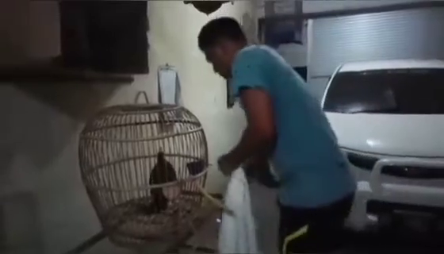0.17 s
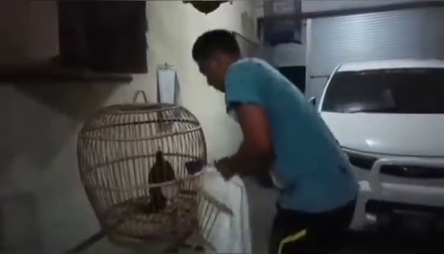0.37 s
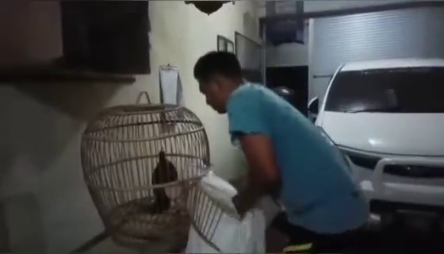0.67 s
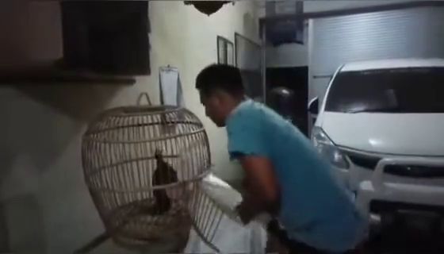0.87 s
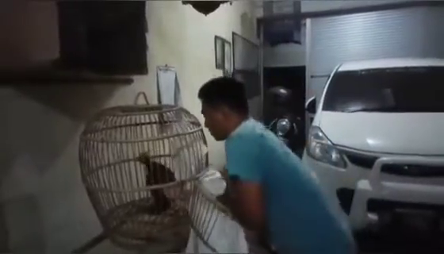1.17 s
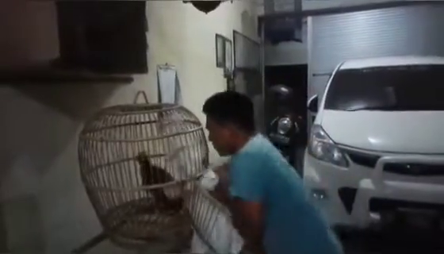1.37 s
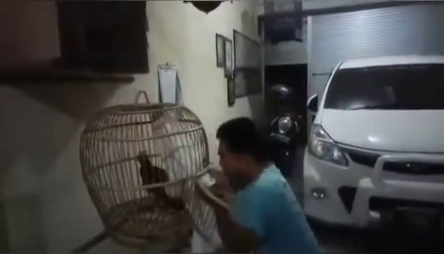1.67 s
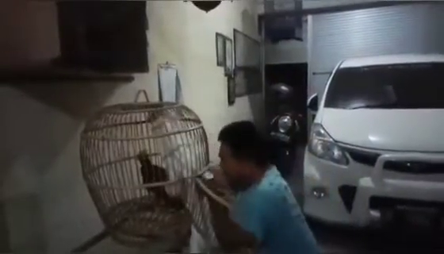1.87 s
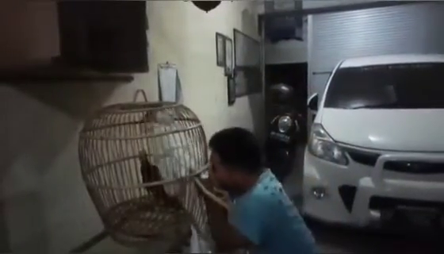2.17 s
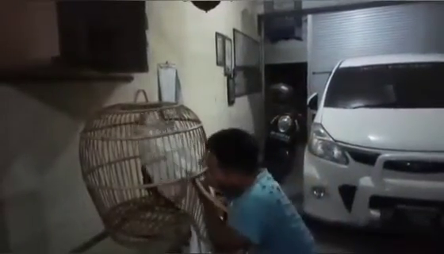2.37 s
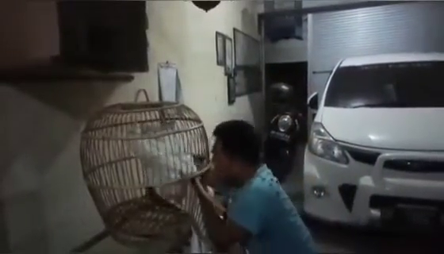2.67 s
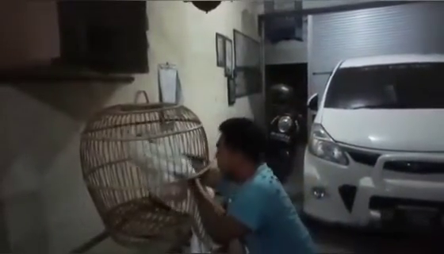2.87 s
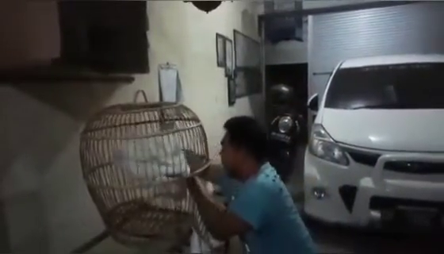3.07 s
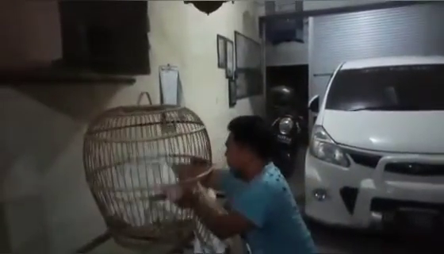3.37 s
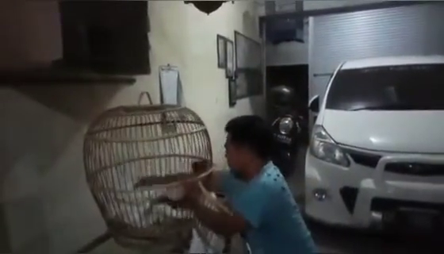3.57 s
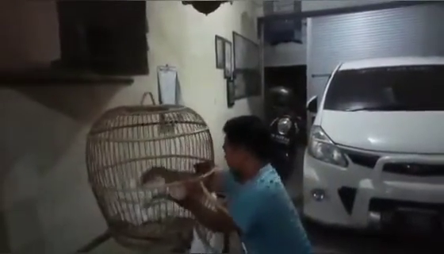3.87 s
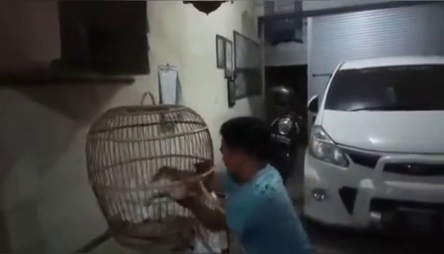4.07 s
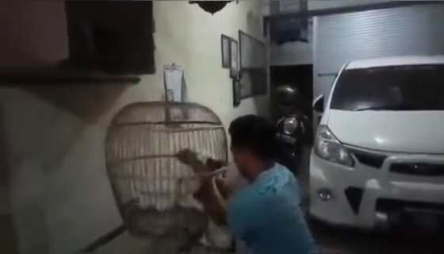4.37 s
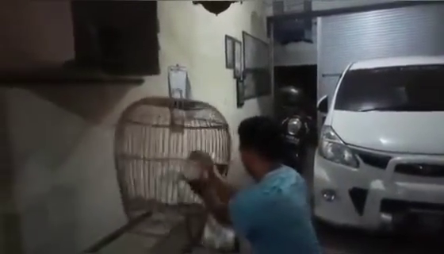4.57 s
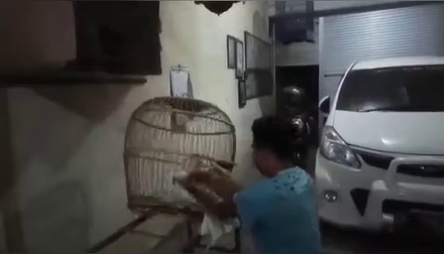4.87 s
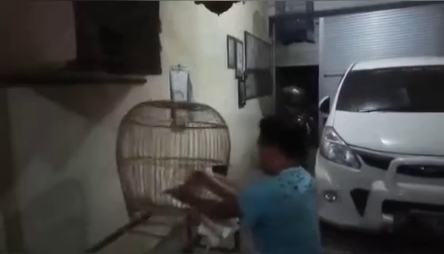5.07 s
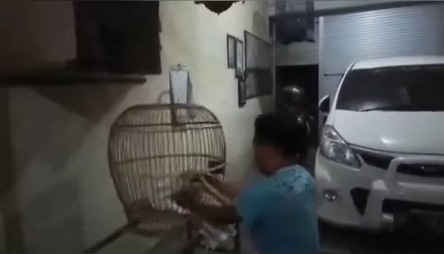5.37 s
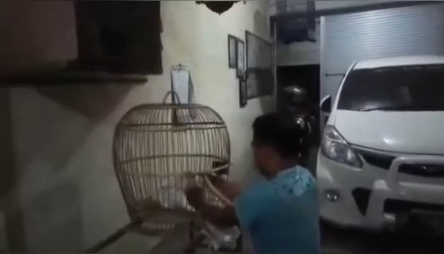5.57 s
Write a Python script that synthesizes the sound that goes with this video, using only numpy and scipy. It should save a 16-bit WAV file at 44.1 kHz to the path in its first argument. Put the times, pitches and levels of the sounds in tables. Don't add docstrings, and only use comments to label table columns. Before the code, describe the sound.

Distant, dull phone sound of someone catching a bird in a wooden cage. Mostly quiet at first, with sparse clicks and light cloth brushing; then a dense clatter of slats, fluttering scrapes and low frame knocks. After a short lull with faint creaks, more rattling and bumping follows, one sharp crack stands out, and the room settles back to soft hum and hiss. Hard walls give short echoes.

```python
import sys
import numpy as np
from scipy import signal
from scipy.io import wavfile
from scipy.ndimage import uniform_filter1d

SR = 44100
rng = np.random.default_rng(int(sys.argv[2]) if len(sys.argv) > 2 else 0)


def persist_wave(psi):
    counts = np.round(np.clip(psi, -1, 1) * 32767).astype(np.int16)
    wavfile.write(sys.argv[1], SR, np.atleast_2d(counts).T)


def rack_gain(trim_db):
    fader = np.asarray(trim_db, float)
    return 10 ** (fader / 20)


N = 251811

# pitch_hz, width_hz, level_db
BARS = [(1720, 250, -12), (2274, 840, -4), (2928, 755, 0.5), (3367, 590, -1.5), (3757, 470, 1.5)]
# pitch_hz, width_hz, level_db
HOOPS = [(760, 490, 2.5), (1049, 154, 3.5), (1329, 787, 2)]
# pitch_hz, width_hz, level_db
FRAME = [(145, 44, 2.5), (205, 39, -2), (277.8, 62, -1.5), (330, 55, -2), (418.3, 138, 0.5), (495, 97, -2),
         (575.4, 136, -4.5)]
# pitch_hz, width_hz, level_db
SHEEN = [(4280, 850, 4), (8140, 1900, -13), (8950, 480, -3), (9770, 3800, -14), (13200, 1400, -23)]


def evened(x):
    return x / np.sqrt(np.mean(x ** 2) + 1e-20)


def read(points, hz):
    f, value = np.transpose(points)
    return np.interp(np.log(hz + 1), np.log(f + 1), value)


def add(mix, s, sound):
    part = mix[max(round(s * SR), 0):][:len(sound)]
    part += sound[:len(part)]


def ring(x, modes):
    out = 0
    for k, (hz, width, db) in enumerate(modes):
        pole = np.exp((2j * np.pi * hz - np.pi * width) / SR)
        rung = signal.lfilter([(1 - abs(pole)) ** 2], np.poly([pole, pole]), x).real
        out = out + (-1) ** k * rack_gain(db) * rung
    return out


def drift(hz):
    steps = rng.standard_normal(N // 64 + 2)
    low_pass = signal.butter(2, min(hz * 128 / SR, 0.9))
    smooth = signal.filtfilt(*low_pass, steps, method="gust")
    return np.clip(evened(np.interp(np.arange(N) / 64, np.arange(len(smooth)), smooth)), -2, 2)


def patchy(spectrum, patch_db):
    a, b, patches = rng.standard_normal((N // 128 + 9, 257, 3)).T
    patches = uniform_filter1d(patches, size=6, axis=0)
    patches = evened(uniform_filter1d(patches, size=16, axis=1))
    level_db = read(spectrum, np.fft.rfftfreq(512, 1 / SR))[:, None] + patch_db * patches
    z = (a + 1j * b) * rack_gain(level_db)
    return evened(signal.istft(z, nperseg=512, noverlap=384)[1][:N])


def room_air():
    # pitch_hz, level_db (per Hz)
    air = [(20, -46.5), (60, 4.5), (130, 4), (250, -7.5), (450, -18.5), (800, -5.5), (1500, -7.5),
           (2500, -9), (3200, -5), (4000, -16.5), (8000, -38)]
    # pitch_hz, level_db
    motor = [(145.3, -74.5), (193.8, -72.5), (242.2, -75), (290.7, -74.5)]
    t = np.arange(N) / SR
    hum = np.zeros(N)
    for hz, db in motor:
        loudness = np.sqrt(2) * rack_gain(db - 0.5 + 4.1 * drift(14.5))
        hum += loudness * np.sin(2 * np.pi * (hz * t + rng.random()) + 0.87 * drift(11.4))
    return rack_gain(-64.5 + 1.6 * drift(5.1)) * patchy(air, 2.2) + hum


def amplifier_hiss():
    # pitch_hz, level_db (per Hz)
    hiss = [(20, -36), (5100, 10), (9100, 8.5), (15100, 10)]
    return rack_gain(-80.5) * patchy(hiss, 0.26)


def garage(x):
    # pitch_hz, fade_s (time to fall 60 dB)
    fade_times = [(150, 0.6), (500, 0.62), (1400, 0.94), (3500, .55), (9000, 0.29)]
    taps = rng.standard_normal((3, SR)) * (rng.random((3, SR)) < 0.1)
    hz, t, z = signal.stft(taps, SR, nperseg=256)
    tails = signal.istft(z * rack_gain(-60 * t / read(fade_times, hz)[:, None]), SR, nperseg=256)[1]
    tail_s = np.arange(tails.shape[1]) / SR
    tails *= np.clip((tail_s - 0.003) / 0.0028, 0, 1)
    tails *= rack_gain(np.interp(tail_s, [0.07, 0.12], [0, -8]))
    turns_per_s = 7
    turn = np.cos(2 * np.pi * (np.arange(N) / SR * turns_per_s + np.arange(3)[:, None] / 3))
    echoes = signal.fftconvolve(x * np.sqrt(2 / 3) * turn, tails / np.linalg.norm(tails[0]), axes=1)
    return echoes[:, :N].sum(0)


def strokes(start, hold, db, rest_db):
    rise_db_per_s, fall_db_per_s = 179, 123
    t = np.arange(0, N + 64, 64)[:, None] / SR
    before_db = rise_db_per_s * np.maximum(start - t, 0)
    after_db = fall_db_per_s * np.maximum(t - start - hold, 0)
    power = (rack_gain(db - before_db - after_db) ** 2).sum(1) + rack_gain(rest_db) ** 2
    return np.interp(np.arange(N) / SR, t[:, 0], 10 * np.log10(power))


def grains(per_s, spread_db, clump_hz, clump_db):
    when, size, sign = rng.random((N, 3)).T
    strength = rack_gain(spread_db * np.minimum(-np.log(size + 1e-9), 4))
    contacts = (when < per_s / SR) * np.sign(sign - 0.5) * strength
    return contacts * rack_gain(clump_db * drift(clump_hz))


def loose_slats():
    contacts = grains(350, 0.87, 30, 0.93)
    slat = rng.integers(0, 16, N)
    out = np.zeros(N)
    for k, hz in enumerate(np.geomspace(1900, 3900, 16)):
        out += ring(contacts * (slat == k), [(hz, 130, 0)])
    return evened(out)


def brushing():
    # start_s, hold_s, level_db, hoop_weight_db
    sweeps = [(0.32, 0.29, -62, -11), (0.717, 0.28, -57.5, -7), (1.416, 0.13, -60.5, -2),
              (2.024, 0.26, -67, -7), (2.613, 0.04, -56.5, -14), (2.834, 0.062, -55.5, -18),
              (3.083, 0.091, -47.5, 0), (3.19, 0.096, -34, -14), (3.43, 0.063, -44, -2.5),
              (3.578, 0.028, -46.5, -2.5), (3.755, 0.19, -62.5, 1), (4.071, 0.13, -48.5, 0),
              (4.2, 0.17, -43, -3.5), (4.386, 0.095, -48, -4), (4.54, 0.48, -48, -.6),
              (4.865, 0.062, -37, -4), (5.005, 0.055, -46.5, -15), (5.14, 0.14, -49.5, -1),
              (5.398, 0.14, -60, -2.5)]
    # start_s, hold_s, level_db
    shoves = [(.3, .1, -74), (.85, 0.57, -74), (2.428, 0.13, -63), (3.063, 0.096, -48.5),
              (3.154, 0.054, -41), (3.39, 0.043, -35.5), (3.496, 0.069, -56), (3.697, 0.25, -60.5),
              (4.18, 0.15, -46), (4.513, 0.064, -46.5), (4.65, 0.078, -41.5), (4.864, 0.093, -39),
              (5.24, 0.092, -61), (5.68, .03, -61)]
    start, hold, db, weight_db = np.transpose(sweeps)
    bars_db = strokes(start, hold, db, -65)
    hoops_db = strokes(start, hold, db + weight_db, -74)
    frame_db = strokes(*np.transpose(shoves), -68)
    fine, coarse = grains(4000, 2.0, 45, 2.8), grains(1200, 2.5, 35, 3.2)
    heavy = grains(300, 1.18, 28, 1.4)
    bars = 0.75 * evened(ring(fine, BARS)) + 0.33 * loose_slats()
    hoops = evened(ring(coarse + 0.7 * fine, HOOPS))
    frame = evened(ring(heavy, FRAME))
    dull = rack_gain(bars_db - 3.5) * bars + rack_gain(hoops_db - 3.5) * hoops + rack_gain(frame_db - 3.5) * frame
    sheen_db = -80 + 0.75 * (bars_db + 50)
    rustle = fine + 2.7 * rng.standard_normal(N)
    return dull, rack_gain(sheen_db) * evened(ring(rustle, SHEEN + [(14160, 14000, -14.5)]))


def creaks():
    # start_s, end_s, start_hz,
    # end_hz, level_db
    groans = [(3.79, 3.91, 3150, 3130, -65), (3.74, 3.92, 2130, 2200, -67), (3.94, 4.06, 2280, 2480, -60),
              (4.42, 4.48, 2750, 2700, -54), (2.62, 2.75, 3250, 3270, -69), (4.97, 5.03, 3200, 3600, -49),
              (4.262, 4.292, 1100, 1080, -42), (4.268, 4.295, 3050, 3000, -42),
              (4.15, 4.172, 1250, 1380, -45), (3.215, 3.3, 2750, 2850, -41), (3.18, 3.25, 2150, 2350, -43),
              (.215, .31, 140, 138, -52)]
    out = np.zeros(N)
    for start, end, hz0, hz1, db in groans:
        turns = np.cumsum(np.linspace(hz0, hz1, round((end - start) * SR))) / SR
        a, b = rng.standard_normal((2, 9000))[:, :len(turns)]
        fuzz = uniform_filter1d(a, size=400) + 1j * uniform_filter1d(b, size=400)
        whistle = evened((fuzz * np.exp(2j * np.pi * turns)).real)
        add(out, start, rack_gain(db) * whistle * signal.windows.tukey(len(turns), 0.5))
    return out


def bumps():
    # start_s, peak_db, pitch_hz, fade_s (time to fall 60 dB)
    blows = [(0.21, -38.5, 250, 0.15), (0.235, -46, 135, 0.2), (0.27, -58, 143.6, 0.55),
             (1.198, -40, 238, 0.098), (2.79, -50, 205, 0.12), (3.026, -35, 174, 0.12),
             (3.128, -24.5, 346, 0.038), (3.236, -22.5, 508, 0.068), (3.332, -29, 202, 0.061),
             (3.368, -29, 437, 0.106), (3.373, -18.5, 697, 0.035), (3.415, -37, 145, 0.11),
             (3.439, -30, 315, 0.069), (3.499, -36, 360, 0.098), (3.796, -54.5, 290, 0.33),
             (4.133, -27, 151, 0.04), (4.493, -26, 348.3, 0.17), (4.547, -26.5, 495, 0.093),
             (4.595, -31.5, 342, 0.17), (4.639, -22, 175, 0.085), (4.666, -37, 290, 0.098),
             (4.699, -37, 464, 0.25), (4.873, -22.5, 511, 0.11), (4.916, -24, 342.8, 0.2),
             (4.959, -29, 550, 0.049), (5.01, -33, 389, 0.096), (5.039, -54, 398, 0.11)]
    out, t = np.zeros(N), np.arange(9000) / SR
    for s, db, hz, t60 in blows:
        blow = rng.standard_normal(len(t)) * np.exp(-t / 0.0086)
        rest = ring(blow, FRAME)
        mode = np.sin(2 * np.pi * hz * t) * rack_gain(-60 * t / t60) * np.minimum(t / 0.0016, 1)
        add(out, s - 0.002, rack_gain(db) * (0.41 * mode + 0.44 * rest / abs(rest).max()))
    return out


def scrape(length_s):
    t = np.arange(1500) / SR
    burst = rng.standard_normal(len(t)) * np.exp(-t / length_s) * np.minimum(t / 0.00012, 1)
    tap = np.linalg.norm(burst) * (t == 0)
    return np.array([burst, tap])


def snaps():
    # start_s, peak_db, pitch_hz
    cracks = [(0.212, -35, 1900), (1.119, -43, 3450), (1.2, -25, 3400), (2.437, -45, 3400),
              (2.505, -36, 3500), (2.788, -35, 3300), (3.333, -28, 1500), (3.577, -33, 2600),
              (4.13, -28, 3300), (4.875, -24, 2600), (3.941, -45, 3000), (4.552, -30, 1040),
              (5.127, -17, 3600), (5.223, -29, 1700), (5.668, -50, 1450)]
    out = np.zeros(N)
    for s, db, hz in cracks:
        crack = ring(scrape(0.0004)[0], [(hz, 0.3 * hz, 0), (0.7 * hz, 0.9 * hz, -3)])
        add(out, s, rack_gain(db - 2.5) * crack / abs(crack).max())
    return out


def glints():
    # start_s, peak_db, echo_db
    bright_ticks = [(1.0914, -60.5, -6), (1.1194, -66, 3), (1.185, -63, 13), (1.2004, -69, 16),
                    (2.434, -55.5, 2.5), (2.503, -46.5, 0.5), (2.784, -59, 4), (3.0859, -59, 4),
                    (3.1456, -37.5, -5), (3.173, -52, 10), (3.257, -59.5, 17.5), (3.3594, -62, 5),
                    (3.525, -55.5, 3), (3.943, -71, 3), (4.137, -59, 4), (4.2744, -62, -3),
                    (4.6735, -59.5, 3), (4.883, -59, 0), (4.9325, -54, 6.5), (5.2587, -61, 3),
                    (5.4954, -63, 0)]
    near, far = np.zeros((2, N))
    for s, db, echo_db in bright_ticks:
        sound = ring(scrape(0.0047), SHEEN)
        sound *= rack_gain(db) / abs(sound[0]).max()
        add(near, s, sound[0])
        add(far, s, rack_gain(echo_db) * sound[1])
    return near + garage(far)


def clicks():
    # start_s, peak_db, pitch_hz, echo_db
    ticks = [(0.654, -53.5, 2720, 6.5), (1.089, -48.5, 3100, 3), (1.116, -52.5, 3700, 11.5),
             (1.2012, -30, 3700, -1), (2.4363, -42, 3230, 1.5), (2.5045, -33.5, 3820, -1.3),
             (2.57, -42.5, 3030, -4), (2.62, -58, 2830, 10), (2.742, -51.5, 2300, 4.5),
             (2.792, -31, 1800, -2.5), (3.0214, -42.5, 1320, 10), (3.146, -24.5, 2860, -5),
             (3.1764, -36.5, 1960, 4.5), (3.1994, -38.5, 1970, 12), (3.2755, -25, 3470, 2),
             (3.2835, -30, 3300, 2), (3.3597, -24, 3370, 0.5), (3.94, -45.5, 2550, 2),
             (4.3274, -38, 1120, 6.5), (4.6485, -40.5, 962, 9.5), (4.8722, -29.5, 803, 6.5),
             (5.243, -39.5, 2650, 1), (5.495, -50, 3520, 0)]
    # start_s, peak_db, pitch_hz, echo_db
    knocks = [(0.0024, -45, 3700, -5), (0.137, -61.5, 3100, 16.5), (0.2105, -48, 1685, 10),
              (1.1862, -38, 2800, 7.4), (1.4154, -47.5, 934, 1), (1.765, -55, 1080, -2.5),
              (2.787, -36.5, 3400, -4.2), (2.8076, -43, 1800, -1), (3.0867, -50, 3250, 4),
              (3.233, -27, 2830, -0.5), (3.2388, -27, 2860, 0), (3.2607, -39, 2700, -3),
              (3.3672, -25.5, 850, -0.5), (3.528, -34, 2800, 2), (3.575, -34, 1134, -6),
              (4.0456, -45, 3070, 1.5), (4.128, -30, 900, 6), (4.155, -29.5, 1340, -4),
              (4.2294, -42.5, 2040, 14), (4.277, -35, 2900, 4), (4.559, -54, 1080, 8),
              (4.6729, -40, 3400, 4), (4.856, -34.5, 1570, 8), (4.9215, -38, 3180, 11),
              (4.9365, -27, 3540, -4), (5.1283, -37.5, 2890, 4.5), (5.2234, -36.5, 1407, 3.5),
              (5.67, -60, 1485, -1)]
    near, far = np.zeros((2, N))
    for rows, hoops_db, contact_s in ((ticks, -15, 0.0033), (knocks, -6.5, 0.0053)):
        for s, db, hz, echo_db in rows:
            touch = scrape(contact_s)
            slat = ring(touch, [(hz, 0.12 * hz, 2.5), (hz, 0.44 * hz, -1.5)])
            top = (hz / 2800) ** 1.12 * ring(touch, BARS) + slat
            low = ring(touch, HOOPS)
            sound = top / abs(top[0]).max() + rack_gain(hoops_db) * low / abs(low[0]).max()
            sound = rack_gain(db) * sound
            add(near, s, sound[0])
            add(far, s, rack_gain(echo_db) * sound[1])
    return near + garage(far)


def phone(x):
    # pitch_hz, level_db
    response = [(20, -17.5), (100, -0.5), (140, 0), (3300, 1), (3800, -4.5), (4300, -2), (4800, -8.5),
                (5500, -38), (6500, -41), (22000, -43)]
    log_gain = read(response, abs(np.fft.fftfreq(8192, 1 / SR))) * np.log(10) / 20
    taps = np.fft.ifft(np.exp(np.conj(signal.hilbert(log_gain)))).real[:4096]
    return signal.oaconvolve(x, taps)[:N]


def scene():
    brush, brush_sheen = brushing()
    bump = bumps()
    bump_with_echo = bump + rack_gain(-2.0) * garage(bump)
    dull = room_air() + brush + creaks() + bump_with_echo + snaps() + clicks()
    return (phone(dull) + glints() + brush_sheen)[None]


def top_cut(x):
    return signal.sosfilt(signal.butter(12, 15525, fs=SR, output="sos"), x)


def record(dry):
    mix = dry + amplifier_hiss()
    return top_cut(mix)


dry = scene()
out = record(dry)
persist_wave(out)
```